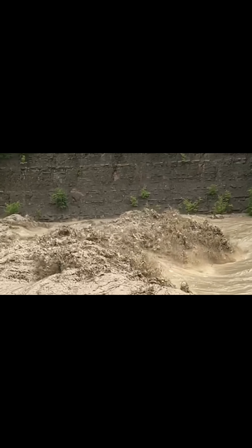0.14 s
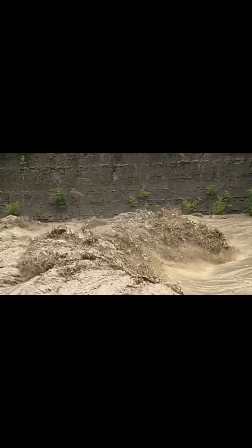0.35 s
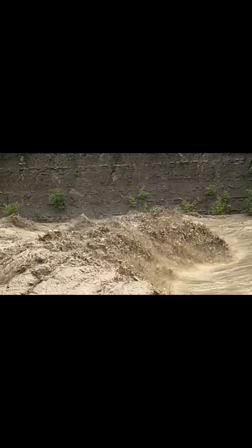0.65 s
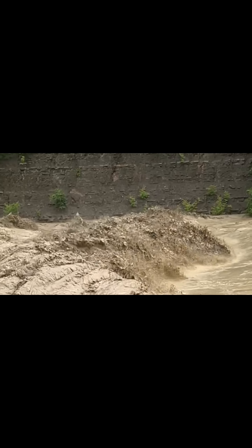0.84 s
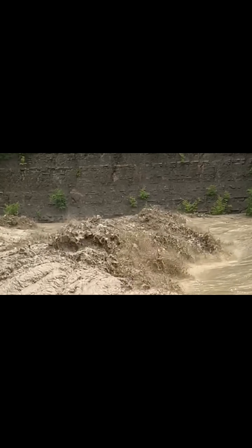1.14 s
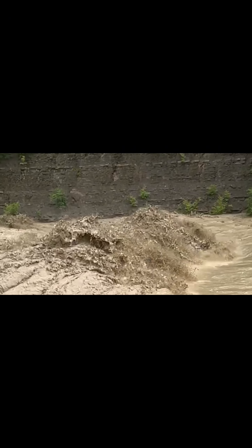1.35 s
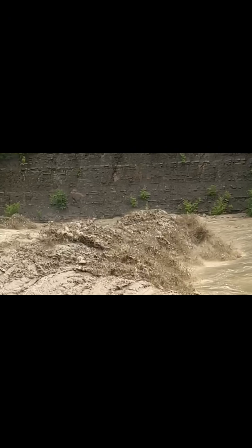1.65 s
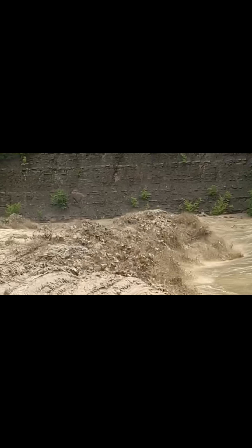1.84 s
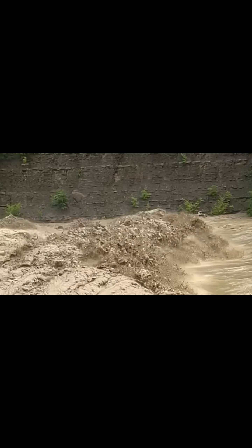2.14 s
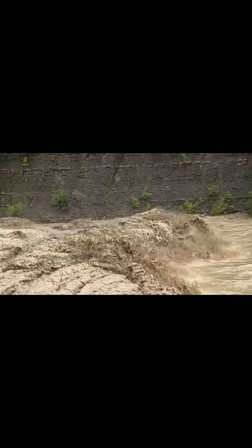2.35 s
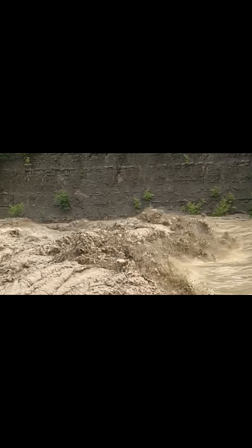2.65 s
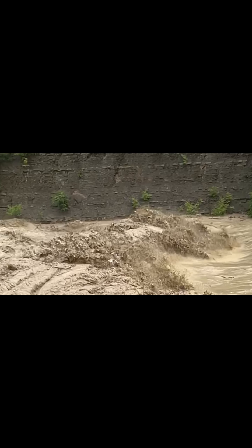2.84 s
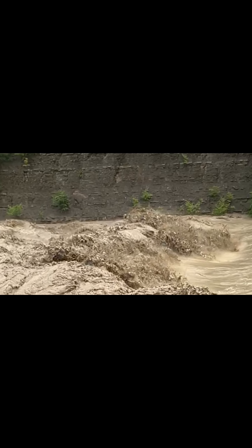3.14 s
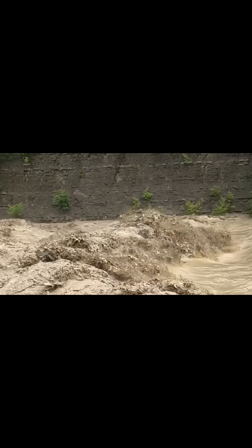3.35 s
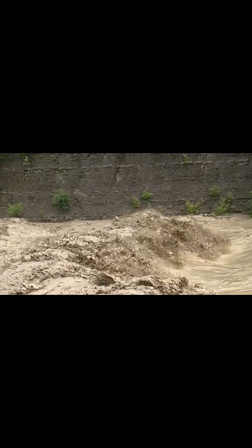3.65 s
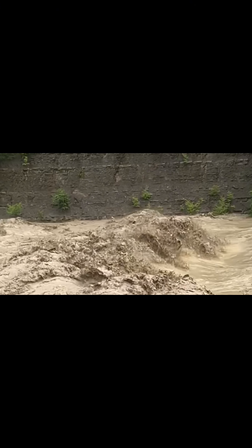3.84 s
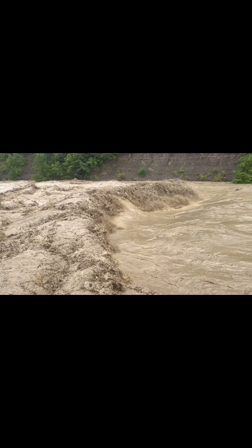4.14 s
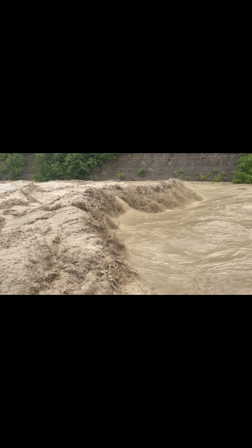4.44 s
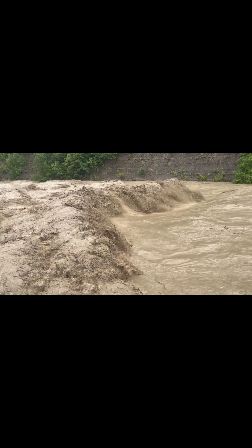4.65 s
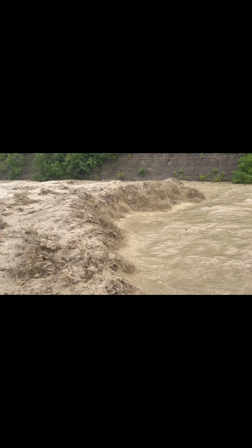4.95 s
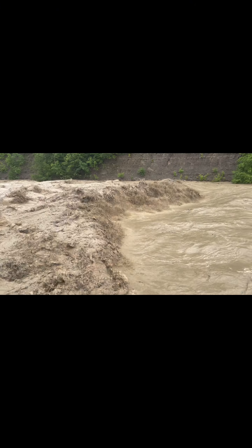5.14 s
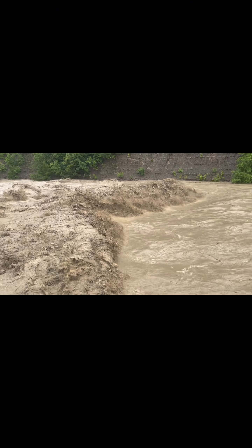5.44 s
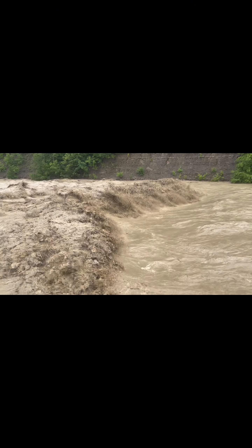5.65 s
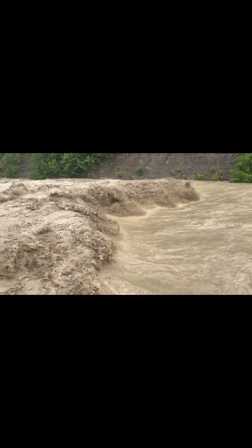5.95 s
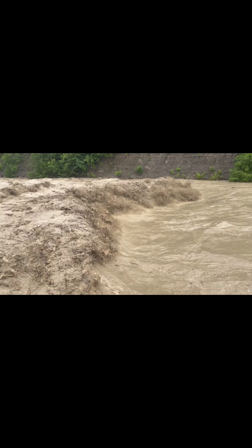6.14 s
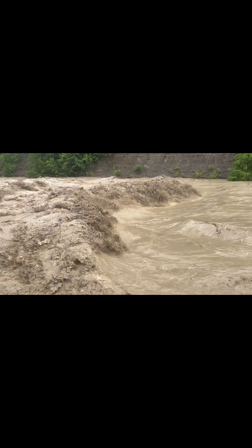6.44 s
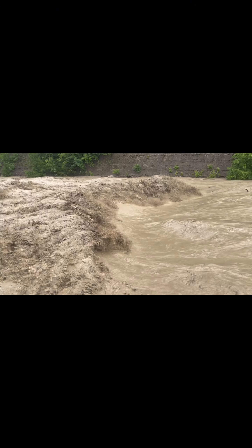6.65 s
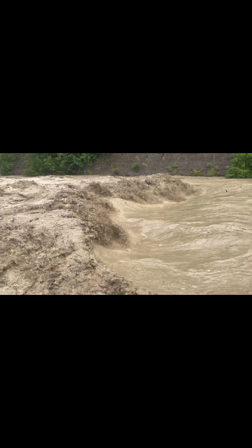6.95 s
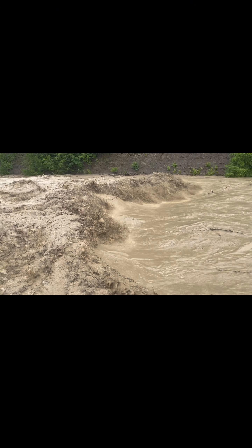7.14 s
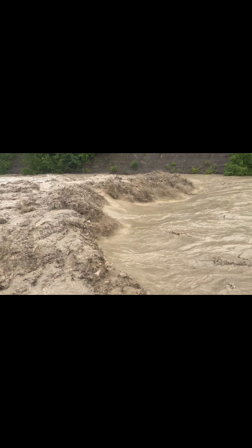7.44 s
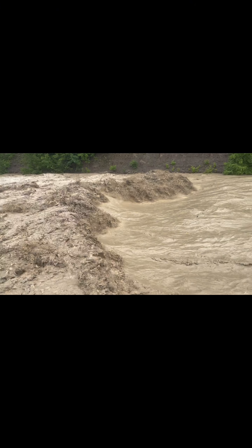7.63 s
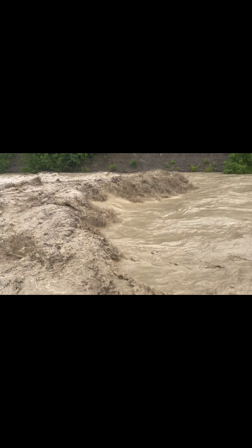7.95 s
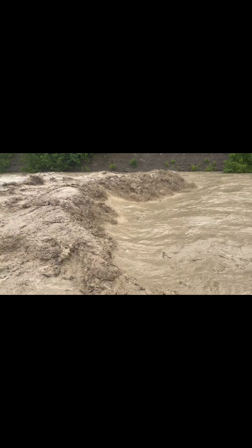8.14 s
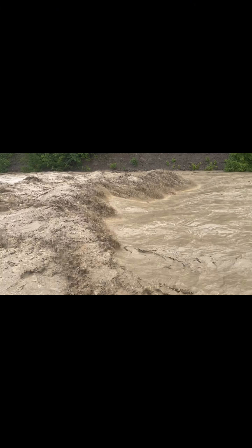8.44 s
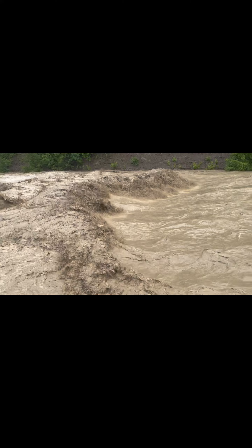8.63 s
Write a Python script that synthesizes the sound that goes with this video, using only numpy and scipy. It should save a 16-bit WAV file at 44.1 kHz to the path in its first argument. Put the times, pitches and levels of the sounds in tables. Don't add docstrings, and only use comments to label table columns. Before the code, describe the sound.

The roar of a river in flood starts at full strength and never stops. From 0 to about 4.1 seconds it is heavy, broad and a little muffled: low rumble, thick churning midrange, countless bubbles bursting in a grainy hiss, with no very high treble. It eases slightly around 0.7 to 2 seconds, swells near 2.4, and pushes hardest just before 4.1. Then a very quick crossfade moves to a second place on the bank. The rush becomes brighter, airier and steadier, starting slightly softer and building gently toward 7 and again about 8.5 seconds. Short, low, rounded thuds bump beneath it, clustered from 4.6 to 5.6, again around 6 to 7, with faint ones near 8. Close, outdoor, wide stereo with lightly clipped peaks and slightly grainy treble; it ends abruptly, still roaring, near 8.8 seconds.

```python
import sys
import numpy as np
from scipy import signal
from scipy.io import wavfile
from scipy.ndimage import uniform_filter1d

SR = 44100
rng = np.random.default_rng(int(sys.argv[2]) if len(sys.argv) > 2 else 0)


def materialize(psi):
    bounded = np.clip(np.atleast_2d(psi).T, -1, 1)
    quanta = np.round(bounded * 32767).astype(np.int16)
    wavfile.write(sys.argv[1], SR, quanta)


def convert_level_to_amplitude(level_db):
    exponent = np.asarray(level_db, float) / 20
    return 10 ** exponent


N = 387638
SIZE, HOP = 1024, 256


def evened(x):
    return x / np.sqrt(np.mean(abs(x) ** 2) + 1e-20)


def spectra(x):
    return signal.stft(x, SR, nperseg=SIZE, noverlap=SIZE - HOP, boundary="even")


def sound(z):
    return signal.istft(z, SR, nperseg=SIZE, noverlap=SIZE - HOP)[1][..., :N]


def roar(near, colour, ports, place, low_cut_hz, bubble_share, patchy_db, splash_db):
    hz, t, near = spectra(near)
    bin_power = np.mean(abs(near) ** 2, 1, keepdims=True)
    near = near / np.sqrt(bin_power + np.mean(abs(near) ** 2) * 0.034)
    a, b, c, d, patches = rng.standard_normal((len(t), len(hz), 5)).T
    share = np.clip(bubble_share, 0, 1)
    common = np.sqrt(1 - share) * (a + 1j * b) + np.sqrt(2 * share) * near
    own = c + 1j * d

    f, like, lead_rad = np.transpose(ports)
    like = np.interp(hz, f, like)[:, None]
    lead_rad = np.interp(hz, f, lead_rad)[:, None]
    right = (like * common + np.sqrt(1 - like ** 2) * own) * np.exp(1j * lead_rad)

    f, *levels_db = np.transpose(colour)
    colour_db = np.array([np.interp(np.log(hz + 1), np.log(f), v) for v in levels_db])[:, :, None]
    patches = evened(uniform_filter1d(uniform_filter1d(patches, 20, 0), 18, 1))
    splashes = evened(uniform_filter1d(rng.standard_normal(len(t)), 20))
    splashes = splashes * (hz / (hz + 1500))[:, None]
    field_db = colour_db + surge_db(place, hz, t) + patchy_db * patches + splash_db * splashes
    low_cut = signal.butter(5, low_cut_hz, "high", fs=SR, output="sos")
    return signal.sosfilt(low_cut, sound(np.array([common, right]) * convert_level_to_amplitude(field_db)))


# f/Hz, left level/dB [per Hz], right level/dB [per Hz]
FIRST_COLOUR = [(44.7, -37, -35.5), (92.5, -43, -42.5), (138, -40.5, -45), (264, -46, -39.5),
                (464, -46, -43), (670, -54, -48.5), (895, -51, -52), (1440, -56.5, -52.5),
                (2445, -62.5, -56), (2870, -62.5, -62.5), (4560, -66.5, -65.5), (6340, -68.5, -70),
                (8500, -76.5, -72.5), (9800, -86, -86.5)]
# f/Hz, likeness [0-1], right phase lead/rad; path difference in the treble
FIRST_PORTS = [(105, .994, .13), (130, .85, .7), (175, .78, 1.55), (250, .8, 2.1), (400, .85, 2.4),
               (650, .42, 4.7), (900, .78, 4.9), (1500, .2, 3.2), (1850, .55, 3.9), (2100, .2, 4.1),
               (2400, .8, 4.2), (2800, .86, 3.14), (4820, .92, -3.14), (9100, .92, -15.8)]


def first_roar(near):
    return convert_level_to_amplitude(17.0) * roar(near, FIRST_COLOUR, FIRST_PORTS, place=0, low_cut_hz=28,
                            bubble_share=0.12, patchy_db=0.89, splash_db=0.3)


# f/Hz, left level/dB [per Hz], right level/dB [per Hz]
SECOND_COLOUR = [(55, -40.8, -40.8), (100, -41, -41.3), (250, -47.8, -46.8), (450, -53, -52.6),
                 (800, -54, -52), (1550, -56.1, -53.2), (1800, -58.9, -60.2), (2700, -63.4, -64.2),
                 (3700, -63.8, -64.7), (5100, -66.6, -70.3), (8400, -70.6, -70.6), (11000, -72, -72),
                 (13500, -75.6, -75.6), (15500, -77.3, -77.3)]
# f/Hz, likeness [0-1], right phase lead/rad
SECOND_PORTS = [(60, .94, -.05), (300, .88, -.08), (800, .68, -.6), (1450, .1, -.6), (1800, .72, -.3),
                (2800, .58, -1.05), (5000, .55, -.75), (5700, .55, 1.0), (7000, .65, 1.4), (8200, .7, 3.1),
                (9700, .7, 5.0), (10900, .7, 5.2), (11500, .7, 5.9), (13000, .7, 6.9), (15400, .7, 9.6)]


def second_roar(near):
    return convert_level_to_amplitude(17.5) * roar(near, SECOND_COLOUR, SECOND_PORTS, place=1, low_cut_hz=43,
                            bubble_share=0.13, patchy_db=0.41, splash_db=0.27)


LAYER_HZ = (150, 930, 4500)
FOLLOWS = (-0.27, 0.87, 0.98)  # rumble, body, spray against whitewater, dB per dB
# t/s, level/dB [about the mean]
WHITEWATER = [
    [(0, 0.3), (.7, -1.3), (1.05, -1), (2.05, -0.9), (2.4, 0.5), (3.05, -0.4), (3.5, 0.5), (4.1, 1.5)],
    [(4.2, -1.2), (4.6, -1.6), (5.2, -0.5), (6, -0.9), (6.6, -0.3), (7.05, 0.4), (7.7, -0.5), (8.45, 0.8),
     (8.79, 0.2)],
]
# rumble level/dB, body level/dB, spray level/dB
LAYER_DB = [
    (-.5, 0, 0),
    (-.7, -0.92, .1),
]
# t/s, level/dB
HEAVES = [(.35, 0.3), (3.15, 1.8), (4.85, 2.5), (5.97, 0), (6.7, 2.5), (8.05, 0)]
HEAVE_S = 0.3


def surge_db(place, hz, t):
    whitewater_db = np.interp(t, *np.transpose(WHITEWATER[place]))
    layers_db = np.outer(FOLLOWS, whitewater_db) + np.array(LAYER_DB[place])[:, None]
    heave_db = sum(db * np.exp(-((t - s) / HEAVE_S) ** 2) for s, db in HEAVES)
    shares = np.array([np.interp(np.log(hz + 1), np.log(LAYER_HZ), row) for row in np.eye(3)])
    return shares.T @ layers_db + np.outer(shares[0], heave_db)


def bubbles(per_s=9000, cycles=12, spread_db=2.5, rise=.15):
    out = np.zeros(N)
    pocket_hz = np.geomspace(250, 9000, 20)
    for hz in pocket_hz:
        u = np.arange(int(cycles / hz * SR)) * hz / SR / cycles
        envelope = u ** 0.42 * np.exp(-4 * u)
        ring = np.sin(2 * np.pi * cycles * (u + rise * u ** 2)) * envelope
        chance = per_s * hz / pocket_hz.sum() / SR
        hits = np.flatnonzero(rng.random(N) < chance)
        bursts = np.zeros(N)
        bursts[hits] = convert_level_to_amplitude(spread_db * np.minimum(rng.exponential(1, len(hits)), 5))
        out += signal.oaconvolve(bursts, ring / np.linalg.norm(ring))[:N]
    return evened(out)


# t/s, peak level/dB, f/Hz
THUDS = [(4.571, -2, 159), (4.713, -18, 127), (4.772, -6, 195), (4.949, -3, 86.1), (5.166, -14, 103),
         (5.455, -7.5, 213), (5.611, -6, 82.6), (5.975, -6, 122), (6.149, -5, 171), (6.675, -8, 102),
         (6.778, -5.5, 84), (6.949, -9, 96.9), (7.898, -24, 117), (8.098, -13, 72.7)]


def thuds(cycles=4.26):
    out = np.zeros(N)
    for s, db, hz in THUDS:
        u = np.arange(int(cycles / hz * SR)) * hz / SR
        swell = convert_level_to_amplitude(db) * np.sin(2 * np.pi * u) * np.sin(np.pi * u / cycles) ** 2
        part = out[round(s * SR):][:len(u)]
        part += swell[:len(part)]
    return out


CHANGE_S = (4.085, 4.185)


def scene():
    fade = np.interp(np.arange(N) / SR, CHANGE_S, (0, 1))
    near = bubbles()
    first = first_roar(near)
    second = second_roar(near)
    return (1 - fade) * first + fade * (second + convert_level_to_amplitude(-4.5) * thuds())


# f/Hz, level/dB
KEPT_DB = [(2500, 18), (4000, 13.5), (4800, 9), (7000, 8.3), (7900, 5.2), (8500, 4.5), (11000, 4.4),
           (13500, 3.6), (15000, 3.8)]
# from t/s, mid level/dB, side level/dB
MARGIN_STEPS = [(0, 0, 0), (4.11, 9, 9), (4.2, -.2, .6), (4.9, .2, -.5), (6.65, -.7, -2.6), (8.3, -2.8, -2)]
MARGIN_WAVER_DB = .5


def joint_stereo(hz, t, z):
    pair = np.array([z[0] + z[1], z[0] - z[1]]) / 2
    power = uniform_filter1d(abs(pair) ** 2, 7, 2)
    narrow = uniform_filter1d(power, 4, 1)
    wide = power[:, :SIZE // 2].reshape(2, -1, 16, len(t)).mean(2).repeat(16, 1)
    whole = (hz[:-1, None] > 7560) & (t > CHANGE_S[1])
    power = abs(np.concatenate([np.where(whole, wide, narrow[:, :-1]), narrow[:, -1:]], 1))

    s, *steps_db = np.transpose(MARGIN_STEPS)
    waver = evened(uniform_filter1d(rng.standard_normal(len(t)), size=6))
    change_db = np.array(steps_db)[:, np.searchsorted(s, t, "right") - 1] + MARGIN_WAVER_DB * waver
    treble = (hz > 7000)[:, None]
    margin_db = np.interp(hz, *np.transpose(KEPT_DB))[:, None] + change_db[:, None] * treble
    kept = power * convert_level_to_amplitude(2 * np.maximum(margin_db, 0)) >= power[::-1]
    makeup = np.sqrt(power.sum(0) / ((power * kept).sum(0) + 1e-30))
    mid, side = pair * kept * makeup
    return np.array([mid + side, mid - side])


def top_cut(x):
    return signal.sosfilt(signal.butter(12, 15760, fs=SR, output="sos"), x)


# from t/s, top f/Hz
BAND_LIMIT = [
    (0, 9230),
    (4.115, 13800),
    (4.165, 15750),
]


def record(dry):
    hz, t, z = spectra(np.clip(dry, -.95, .95))
    s, top_hz = np.transpose(BAND_LIMIT)
    limited = z * (hz[:, None] < top_hz[np.searchsorted(s, t, "right") - 1])
    start = np.sin(np.pi / 2 * np.minimum(np.arange(N) / SR / .004, 1)) ** 2
    mix = start * sound(joint_stereo(hz, t, limited))
    return top_cut(mix)


dry = scene()
out = record(dry)
materialize(out)
```